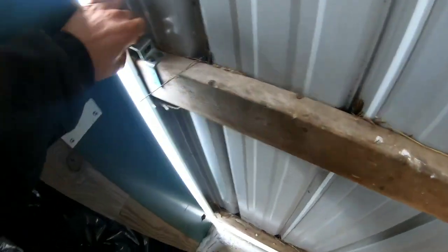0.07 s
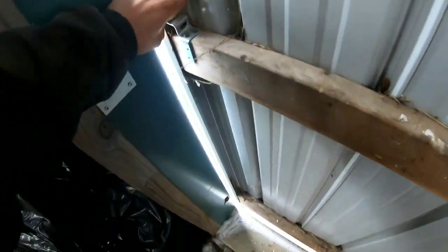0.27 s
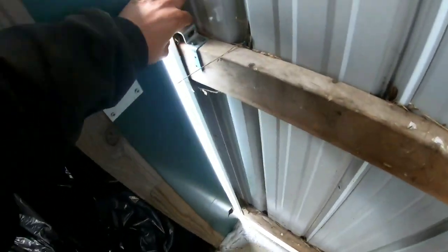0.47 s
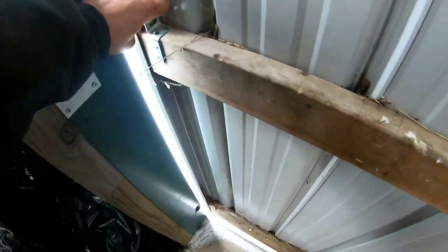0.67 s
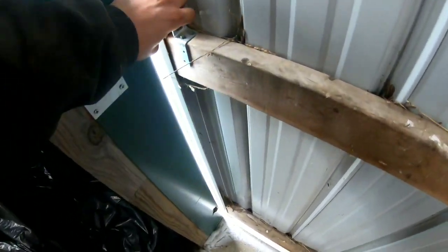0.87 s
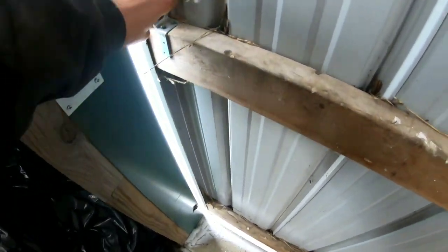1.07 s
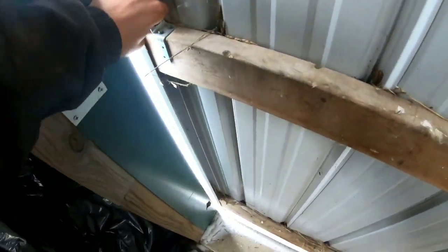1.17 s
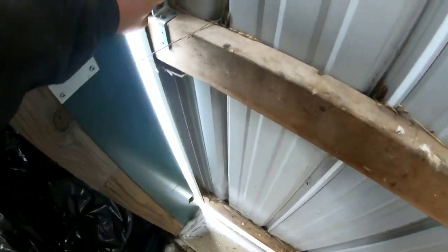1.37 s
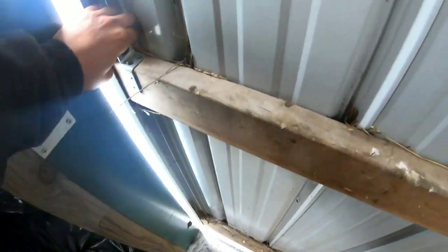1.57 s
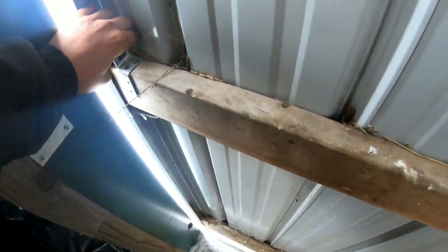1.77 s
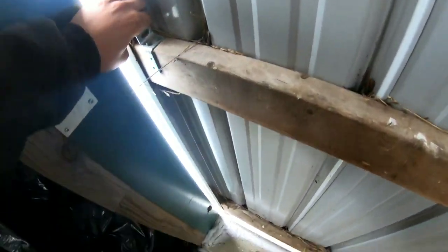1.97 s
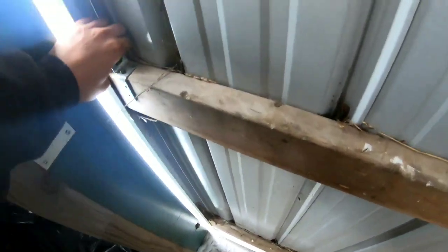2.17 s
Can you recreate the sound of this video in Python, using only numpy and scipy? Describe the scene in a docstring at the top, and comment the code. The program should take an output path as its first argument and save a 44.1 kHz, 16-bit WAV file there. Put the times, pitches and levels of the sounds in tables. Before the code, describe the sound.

A stiff metal latch is worked by hand on a steel barn door: sharp clack near the start, scattered rattles and scrapes, then stronger knocks at the end, over low thumps and rumble, heard close.

```python
"""A stiff metal latch on a sheet-steel barn door knocks, rattles and scrapes close by, worked by a hand.
Knocks are clusters of noisy contacts that ring latch modes and sheet; scraping is dense noise grains.
The rubbed latch squeals faintly, as narrow wavering tones. Each tug thumps the door panel with decaying
low sines and a thud; filtered noise rumbles on below, and a dull noise tail answers from the barn.
The stereo picture is narrow at first and opens to the left later."""
import sys
import numpy as np
from scipy import signal
from scipy.io import wavfile
from scipy.ndimage import uniform_filter1d

SR = 44100
rng = np.random.default_rng(int(sys.argv[2]) if len(sys.argv) > 2 else 0)


def store_wav(level_fs):
    """Save 16-bit WAV to argv[1]."""
    pcm = np.round(np.clip(np.atleast_2d(level_fs), -1, 1) * 32767)
    wavfile.write(sys.argv[1], SR, pcm.T.astype(np.int16))


def boost_factor(decibels):
    """Convert a level in decibels to a linear amplitude factor."""
    exponent = np.asarray(decibels, float) / 20
    return 10 ** exponent


N = 97372


def evened(x):
    """Scales to rms 1."""
    return x / np.sqrt(np.mean(x ** 2) + 1e-20)


def read(points, hz):
    """Interpolates a (Hz, value) table on a log-frequency axis."""
    f, value = np.transpose(points)
    return np.interp(np.log(hz + 1), np.log(f + 1), value)


def add(mix, s, sound):
    """Mixes a sound in at a time in seconds."""
    part = mix[..., max(round(s * SR), 0):][..., :sound.shape[-1]]
    part += sound[..., :part.shape[-1]]


def colour(x, points):
    """Minimum-phase filter with the given (Hz, dB) spectrum, floored at -100 dB."""
    hz = abs(np.fft.fftfreq(8192, 1 / SR))
    log_gain = np.log(boost_factor(np.maximum(read(points, hz), -100)))
    response = np.exp(np.conj(signal.hilbert(log_gain)))
    taps = np.fft.ifft(response).real[:4096] * np.hanning(8192)[4096:]
    taps = taps.reshape((1,) * (x.ndim - 1) + (-1,))
    return signal.fftconvolve(x, taps, axes=-1)[..., :x.shape[-1]]


def dying(noise, t60):
    """Noise whose bands each decay at their own speed, by a (Hz, T60 in seconds) table."""
    hz, t, z = signal.stft(noise, SR, nperseg=128)
    decay = boost_factor(-60 * t / read(t60, hz)[:, None])
    return signal.istft(z * decay, SR, nperseg=128)[1][..., :noise.shape[-1]]


def knock(s, db, low_db, high_db, chatter_s, strongest_hz):
    """A faint swelling rattle leads in, then a chatter of contacts cracks and rings latch and sheet; two views."""
    # Latch modes. Each row: frequency in Hz, level in dB, T60 in seconds.
    latch_modes = [(577, 7.5, 0.039), (914, -14, 0.12), (1150, -25, 0.085), (1345, 10, 0.019),
                   (1780, -13, 0.04), (2340, 0.5, 0.11), (2623, -0.5, .07), (2770, -3, 0.07),
                   (3160, -3.5, 0.084), (3670, -5.5, 0.084), (4600, -4, 0.13), (5840, -15.5, 0.066),
                   (6930, -5.5, 0.054)]
    # Spectrum of the struck sheet. Each row: frequency in Hz, relative level in dB per Hz.
    sheet_spectrum = [(180, -23.5), (300, -3.5), (1060, -17), (2790, -14), (4150, -17.5), (5600, -18),
                      (6960, -21.5), (8500, -27.5), (12300, -39), (15000, -50), (16300, -108)]
    # Decay of the sheet. Each row: frequency in Hz, T60 in seconds.
    sheet_t60 = [(300, 0.27), (1400, 0.12), (4000, 0.068), (12000, 0.033)]
    contacts_per_s, lead_in_db, lead_in_s = 3300, -16, 0.011
    crack_db, crack_t60_s = 6, 0.014
    ring_db, ring_spread_db, detune_spread = -5, 4, 0.008
    strongest_db, strongest_rise_s, strongest_t60_cycles = 6.5, 0.0015, 70

    lead, t = 1500, np.arange(9000) / SR  # lead: samples of lead-in ahead of the knock
    size = lead + len(t)
    hz, level_db, t60 = np.transpose(latch_modes)[:, :, None]
    chance = rng.standard_normal((3, 2, len(latch_modes), 1))  # level, detuning, phase
    mode_gain = boost_factor(level_db + ring_spread_db * chance[0] - 60 * t / t60)
    mode_hz = hz * (1 + detune_spread * chance[1, :1])
    modes = mode_gain * np.sin(2 * np.pi * mode_hz * t + chance[2])

    # contact powers
    hits = rng.exponential(1, size) * (rng.random(size) < contacts_per_s / SR)
    hits[lead] = 1.5
    lead_in = boost_factor(lead_in_db) * np.exp(-t[lead:0:-1] / lead_in_s)
    hits *= np.r_[lead_in, np.exp(-t / chatter_s)] ** 2
    crack = np.sqrt(abs(signal.fftconvolve(hits, boost_factor(-120 * t / crack_t60_s))[:size]))
    sheet = boost_factor(crack_db) * crack * rng.standard_normal((2, size))
    rise = 1 - np.exp(-t / chatter_s)
    sheet_ring = dying(rng.standard_normal((2, len(t))), sheet_t60)
    add(sheet, lead / SR, np.sqrt(hits.sum() * rise) * sheet_ring)

    body = evened(colour(sheet, sheet_spectrum))
    add(body, lead / SR, boost_factor(ring_db) * evened(modes.sum(1)))
    body = colour(body, [(150, low_db - 2.0), (500, low_db + 1.5), (1200, low_db + 7.5), (1900, 0), (4000, 0),
                         (5500, high_db + 13.5), (12000, 1.32 * high_db + 13), (16000, 0.98 * high_db + 4.0)])
    out = body / np.sqrt(np.mean(body[0, lead:lead + 500] ** 2))  # rms 1 at the onset
    ring = boost_factor(strongest_db - 60 * t * strongest_hz / strongest_t60_cycles)
    ring = ring * (1 - np.exp(-t / strongest_rise_s))
    add(out, lead / SR, ring * np.sin(2 * np.pi * strongest_hz * t + chance[2, :, 0]))
    return s - lead / SR, boost_factor(db) * out / 3


def scrape():
    """Metal grinds on metal: dense uneven grains with a short tail, in drifting patches; two views."""
    # Scrape spectrum. Each row: frequency in Hz, relative level in dB per Hz.
    scrape_spectrum = [(150, -15), (250, -6.5), (460, -2), (2760, -15), (3770, -18.5), (4650, -20),
                       (7840, -26.5), (9170, -38.5), (13000, -39), (16000, -100.5)]
    # Course of the grinding. Each row: time in seconds, level in dB, treble tilt in dB before its weight.
    grinding = [(0, -47, -2), (.09, -50, 0), (.145, -62, -4), (.175, -50, 0), (.25, -48, 0), (.33, -40, -3),
                (.44, -48, -3), (.53, -54, -6), (.6, -50, 3), (.7, -49, 0), (.8, -52, 0), (.86, -52, -4),
                (.93, -44, -4), (1.03, -46, 3), (1.07, -52, 0), (1.11, -48, 5), (1.17, -52, 3),
                (1.25, -60, -4), (1.3, -54, 5), (1.4, -52, -5), (1.48, -52, -3), (1.55, -47, 0),
                (1.67, -50, 3), (1.81, -49, 3), (1.91, -58, 0), (1.98, -50, 0), (2.04, -42, 3),
                (2.1, -44, -3), (2.17, -41, 0), (2.21, -42, -2)]
    grains_per_s, grain_spread_db, grain_t60_s, patch_db = 4300, 1.5, 0.015, 1.5

    grains = boost_factor(2 * grain_spread_db * rng.exponential(1, N)) * (rng.random(N) < grains_per_s / SR)
    power = signal.fftconvolve(grains, boost_factor(-120 * np.arange(2000) / SR / grain_t60_s))[:N]
    bed = evened(colour(np.sqrt(abs(power)) * rng.standard_normal((2, N)), scrape_spectrum))
    hz, t, z = signal.stft(bed, SR, nperseg=256)
    patches = uniform_filter1d(rng.standard_normal(z.shape[1:]), size=4, axis=0)
    patches = evened(uniform_filter1d(patches, size=14, axis=1))
    s, level_db, treble_db = np.transpose(grinding)
    treble_weight = read([(2500, 0), (7000, 0.92)], hz)[:, None]
    gain_db = np.interp(t, s, level_db) + treble_weight * np.interp(t, s, treble_db)
    z = z * boost_factor(patch_db * patches + gain_db)
    return signal.istft(z, SR, nperseg=256)[1][:, :N]


def squeal(s, length_s, db):
    """The rubbed latch squeals: a narrow wavering tone with its octave that swells and fades."""
    squeal_hz, width_hz, octave_db = 1850, 30, -6
    t = np.arange(round(length_s * SR)) / SR
    noise = rng.standard_normal(8000) + 1j * rng.standard_normal(8000)
    waver = signal.lfilter([1], [1, -np.exp(-np.pi * width_hz / SR)], noise)
    phase = np.angle(waver[-len(t):]) + 2 * np.pi * squeal_hz * t
    tone = np.sin(phase) + boost_factor(octave_db) * np.sin(2 * phase)
    tone = tone * np.sqrt(evened(abs(waver))[-len(t):])
    return s, boost_factor(db) * np.sqrt(np.sin(np.pi * t / length_s)) * np.array([tone, tone])


def tug(s, db, hz, deep_db):
    """A soft push rings the door panel: one mid ring, the deep ring and a dull thud."""
    ring_t60_s, rise_s, thud_db = 0.16, 0.0026, -3
    push_db, push_t60_s = 1, 0.021  # extra onset of the mid ring, on top of its own decay
    deep_hz, deep_t60_s = 49.1, 0.2
    t = np.arange(14000) / SR
    phase = 2 * np.pi * rng.random(2)
    thud = evened(colour(rng.standard_normal(len(t)), [(30, -6.5), (100, 12.5), (230, -1.5), (400, -13),
                                                       (900, -23.0), (3000, -59.0), (7000, -100)]))
    push = 1 + boost_factor(push_db - 60 * t / push_t60_s)
    ring = np.sin(2 * np.pi * hz * t + phase[0]) * push
    ring = (ring + boost_factor(thud_db) * thud) * boost_factor(-60 * t / ring_t60_s)
    deep = boost_factor(deep_db - 60 * t / deep_t60_s) * np.sin(2 * np.pi * deep_hz * t + phase[1])
    rise = (1 - np.exp(-(t / rise_s) ** 2)) ** 2
    return s, boost_factor(db) * rise * (ring + deep)


def rumble():
    """The held door shakes in its low modes: low-passed noise under a slow level curve."""
    # Door shaking. Each row: time in seconds, rumble level in dB.
    shaking = [(0.0, -21.5), (0.198, -30), (0.39, -25), (0.66, -30), (0.84, -30.5), (0.97, -20),
               (1.139, -26.5), (1.36, -30.5), (1.52, -23), (1.66, -22.5), (1.79, -29.5), (2.01, -29),
               (2.21, -29.5)]
    # Rumble spectrum. Each row: frequency in Hz, relative level in dB per Hz.
    rumble_spectrum = [(8.8, -68), (15, -3), (38, 1), (65, 2.5), (103, -13.5), (157, -5), (380, -28),
                       (700, -38), (910, -53), (1540, -120)]
    level = boost_factor(np.interp(np.arange(N) / SR, *np.transpose(shaking)))
    return level * evened(colour(rng.standard_normal(N), rumble_spectrum))


def barn(x):
    """The barn answers with a dull tail: convolution with noise whose bands decay separately."""
    # Decay of the barn. Each row: frequency in Hz, T60 in seconds.
    barn_t60 = [(300, 0.15), (1400, 0.53), (4000, 0.23), (12000, 0.069)]
    barn_db = -13.5
    tail = dying(rng.standard_normal((2, 20000)), barn_t60)
    return boost_factor(barn_db) * signal.fftconvolve(x, tail / np.linalg.norm(tail[0]), axes=1)[:, :N]


def early_colouring(metal):
    """A treble dip and hump are heard over the metal sounds at first and fade out."""
    # Early colour. Each row: frequency in Hz, gain in dB.
    early_gain = [(3600, 2), (4150, -5.5), (4700, 7.5), (5600, -1.5)]
    # Start and end of the fade in seconds.
    fade_s = (0.42, 1)
    early = np.interp(np.arange(N) / SR, fade_s, (1, 0))
    return early * colour(metal, early_gain) + (1 - early) * metal


def stereo(mid, other):
    """Left and right from mid and a side signal that mixes the second view with a share of the mid."""
    # Side spectrum. Each row: frequency in Hz, gain in dB.
    side_gain = [(30, -44.5), (200, -29), (400, -20.5), (800, -7), (1400, -2.5), (5000, -3.5), (12000, 4)]
    # Stereo width. Each row: time in seconds, side gain in dB.
    width = [(0, -45.5), (1.3, -50.5), (1.45, -16), (1.75, -5.5), (2.0, 0), (2.21, -1.5)]
    left_share = 0.24  # pulls the picture left
    side = colour(left_share * mid + np.sqrt(1 - left_share ** 2) * other, side_gain)
    side = side * boost_factor(np.interp(np.arange(N) / SR, *np.transpose(width)))
    return np.array([mid + side, mid - side])


def scene():
    """Latch, door and barn, turned to left and right."""
    # Latch knocks. Each row: time in seconds, level in dB before a division by 3, low-mid tilt in dB,
    # treble tilt in dB before its weights and offsets, chatter time constant in seconds, strongest ring in Hz.
    knock_rows = [(.164, -39, 15, -40, 0.0032, 768), (0.2789, -25.5, -15.5, -13, 0.03, 501),
                  (.2988, -13.5, -3, -5, 0.0015, 1416), (0.3029, -14, -1.5, -10, 0.0063, 2340),
                  (.309, -15.5, -16.5, -26.5, 0.005, 2770), (0.3681, -29.5, -4, -10.5, 0.021, 4600),
                  (0.4188, -40, -9, -12, 0.019, 5400), (.6625, -31.5, 6.5, -22, 0.0019, 2330),
                  (.6712, -28.5, -1.5, -43, 0.0014, 1796), (.7133, -41, -17.5, -9.5, 0.0052, 4760),
                  (0.8803, -27, 11, -19, 0.02, 1005), (.9224, -23.5, 4.5, -19.5, 0.0031, 1195),
                  (.9585, -32, 27, -23, 0.0049, 1215), (1.02, -32.5, -1.5, -11.5, 0.015, 420),
                  (1.084, -34.5, 18, -15, 0.0077, 1062), (1.1168, -23, -4.5, -6.5, 0.015, 5120),
                  (1.1376, -41, 4, -2, 0.0087, 7220), (1.2755, -45.5, -16, -9, 0.015, 5900),
                  (1.3, -46, -12, 1, 0.013, 5400), (1.3246, -32.5, 4, -32, 0.03, 716),
                  (1.3565, -21.5, -10.5, -18, 0.003, 3350), (1.3644, -28.5, -10, -35, 0.02, 2450),
                  (1.457, -31.5, 11.5, -36, 0.004, 1240), (1.503, -14.5, -0.5, -26, 0.0052, 1168),
                  (1.5662, -18, -21, -6, 0.0072, 6440), (1.709, -22.5, -5.5, -21, 0.0027, 1888),
                  (1.784, -26.5, -7, -5, 0.0034, 6300), (1.8694, -41, -3, -9.5, 0.0066, 6260),
                  (1.918, -49, -8, 3, 0.0039, 6200), (1.9453, -42, 6.5, -2, .0045, 5930),
                  (2.0044, -17, -13.5, -17, 0.0089, 2284), (2.0208, -22, -1, -28, 0.007, 540),
                  (2.036, -27.5, -6, -14, 0.03, 5270), (2.0526, -11, -0.5, -6, 0.0018, 1780),
                  (2.128, -17, -3.5, -12, 0.004, 1380), (2.1385, -13, -18, -6, 0.0029, 3770)]
    # Squeals. Each row: start in seconds, length in seconds, level in dB.
    squeal_rows = [(1.595, 0.13, -52), (1.79, 0.085, -51), (2.145, .05, -54)]
    # Tugs on the panel. Each row: time in seconds, level in dB, mid ring in Hz, deep ring in dB re the tug.
    tug_rows = [(0.009, -16.5, 148, -10), (0.277, -16, 151.6, -9), (0.326, -17.5, 153, -21),
                (0.568, -34, 146, -7), (0.66, -12, 113.2, 2.5), (0.702, -19, 166.7, 3.5),
                (0.782, -26.5, 116, 10.5), (0.891, -22, 117, 0), (0.954, -21.5, 160, -17),
                (1.017, -9, 173.4, -2), (1.096, -23.5, 123, 13), (1.116, -18.5, 142.5, -35),
                (1.335, -17, 104, 2.5), (1.397, -23.5, 107, -29), (1.501, -15, 103.7, 4),
                (1.504, -17.5, 206.8, -30), (1.549, -17, 147.2, -3), (1.699, -23.5, 109, -14),
                (1.778, -26, 170.3, 12), (1.942, -20.5, 177.7, 7), (1.996, -13.5, 112, -4),
                (2.016, -13, 176, -21), (2.05, -10, 234.3, -5), (2.099, -20.5, 215, 1),
                (2.137, -15, 148.5, -36)]
    latch, door = np.zeros((2, N)), rumble()
    for row in knock_rows:
        add(latch, *knock(*row))
    for row in squeal_rows:
        add(latch, *squeal(*row))
    for row in tug_rows:
        add(door, *tug(*row))
    metal = latch + barn(latch) + scrape()
    front, other = early_colouring(metal)
    return stereo(front + door, other)


def top_cut(x):
    """Nothing passes above the cut-off."""
    return signal.sosfilt(signal.butter(12, 16230, fs=SR, output="sos"), x)


def record(dry):
    """Turns the finished mix into the output."""
    return top_cut(dry)


dry = scene()
out = record(dry)
store_wav(out)
```